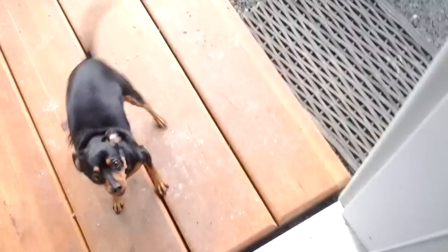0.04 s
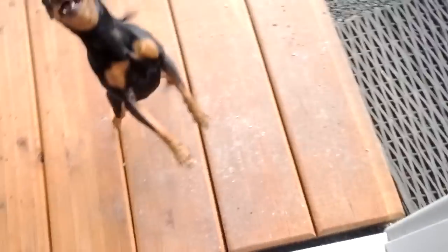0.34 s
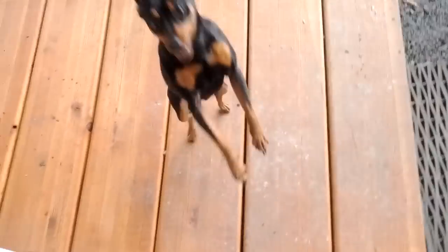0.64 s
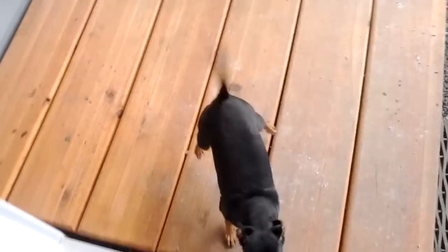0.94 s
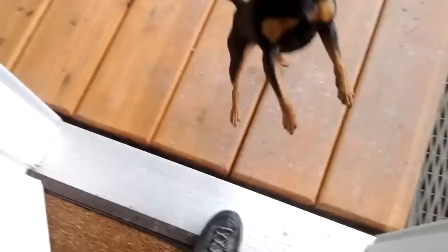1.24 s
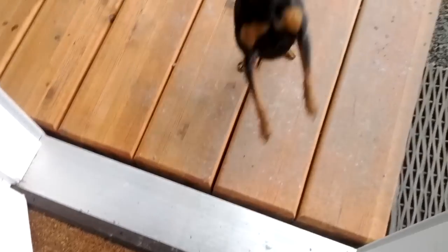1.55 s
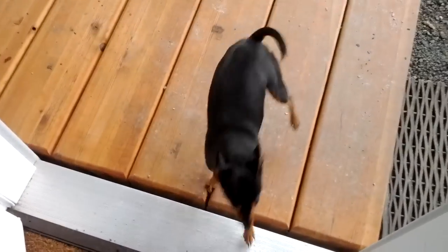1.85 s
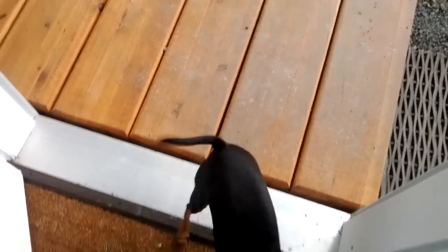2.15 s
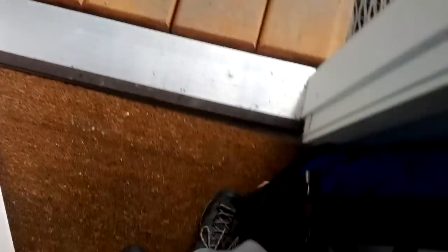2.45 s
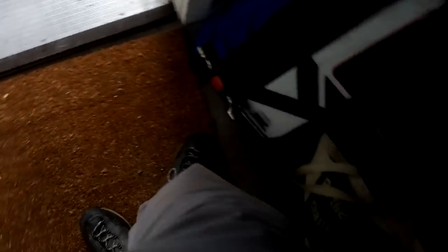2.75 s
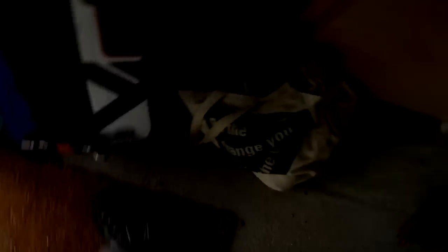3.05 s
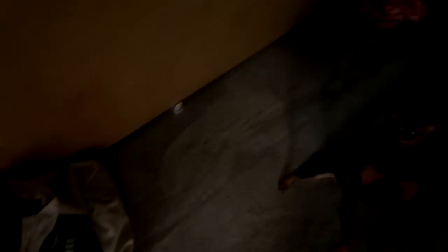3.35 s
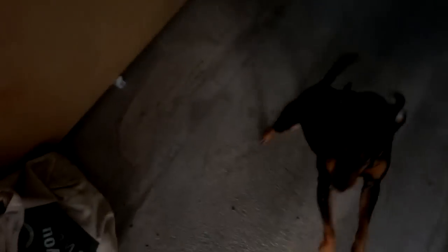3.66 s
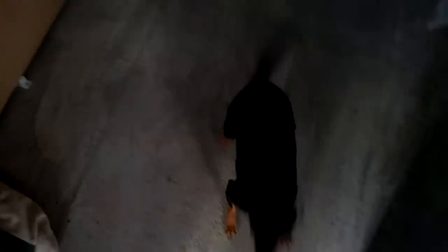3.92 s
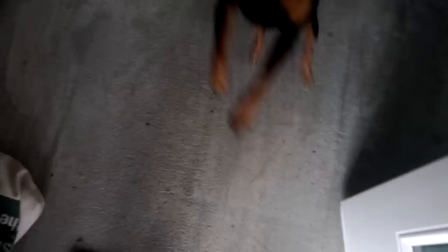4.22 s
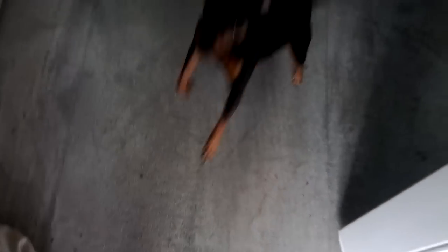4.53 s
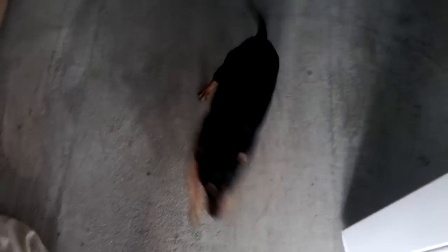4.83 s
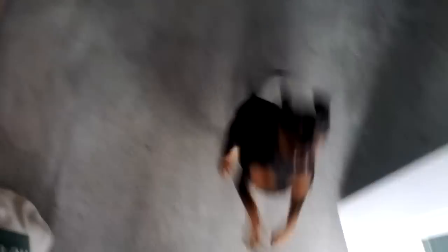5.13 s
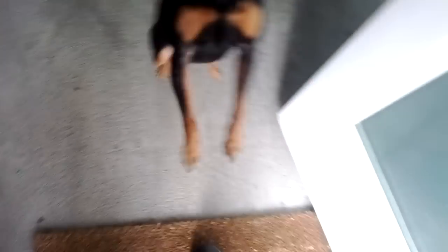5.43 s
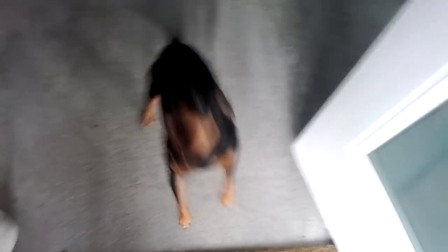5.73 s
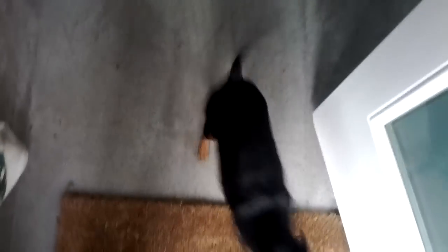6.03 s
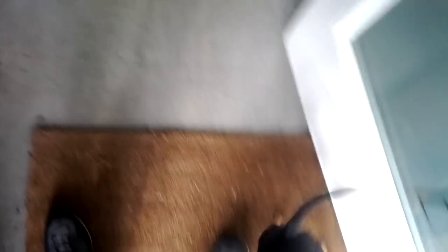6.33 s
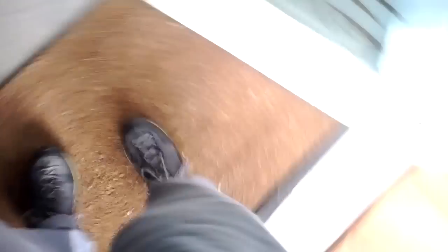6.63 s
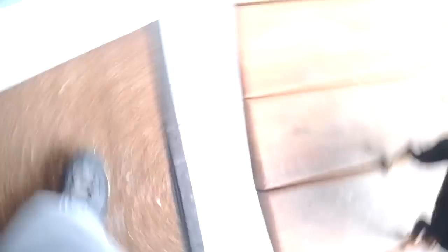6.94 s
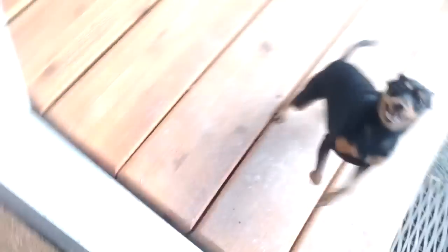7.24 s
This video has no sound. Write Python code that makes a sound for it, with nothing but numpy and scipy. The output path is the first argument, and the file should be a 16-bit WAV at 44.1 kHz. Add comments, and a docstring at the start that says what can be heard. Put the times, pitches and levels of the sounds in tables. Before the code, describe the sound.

Light claw ticks, a soft paw thud and a brief whimper lead into a steady run of piercing yelps from a little dog, with breathy puffs and scattered claw clicks between them. The sound starts dry on a wooden deck, gains a short echo as the dog runs indoors, then dries out again. The microphone is close and hand-held, with faint hiss, soft rumble and slight overload on peaks.

```python
"""Claws tick on a wooden deck over faint hiss; a paw thuds, and a small excited dog puffs and whimpers.
Then it jumps and yelps, running into a concrete-floored room that rings behind it, and out again.
Each shrill yelp, a tone of the vocal folds shaped by throat and mouth, falls away into a little grunt.
The puffs are turbulent air; claws and paws sound by impact and friction. The close, hand-held
microphone rumbles as it moves, and the loud yelps overload it."""
import sys
import numpy as np
from scipy import signal
from scipy.fft import rfft, irfft
from scipy.io import wavfile
from scipy.ndimage import uniform_filter1d

SR = 44100
rng = np.random.default_rng(int(sys.argv[2]) if len(sys.argv) > 2 else 0)


def transcribe(signal):
    """Save signal, clipped to [-1, 1], as a 16-bit WAV file at the path in sys.argv[1]."""
    frames = np.atleast_2d(signal).T
    limited = np.clip(frames, -1, 1)
    pcm = np.round(limited * 32767).astype(np.int16)
    wavfile.write(sys.argv[1], SR, pcm)


N = 329868
TIME = np.arange(N) / SR

# background hiss: frequency_hz, gain_db
AIR_SPECTRUM = [(18, -33), (30, 4.5), (133, 2.5), (379, -13), (852, -9), (996, -4), (1360, -15), (2910, -9),
                (6370, -16), (11300, -9.5), (15500, -19)]
# handling rumble: time_s, level_db
RUMBLE_LEVELS = [(0, -58), (2.4, -61), (2.8, -46), (3.8, -57), (3.88, -38), (4.75, -43.5), (5, -44),
                 (7.48, -65)]
# claws on the floor: start_s, level_db, scrape_decay_s
CLAW_STRIKES = [(0.02, -20.5, 0.0062), (0.075, -18, 0.0054), (0.242, -17.5, 0.011), (0.282, -23, 0.012),
                (0.338, -16.5, 0.0022), (1.9, 6, 0.0053), (1.932, -26, 0.0069), (2.443, -11, 0.012),
                (3.002, -18, 0.0042), (3.418, -23.5, 0.0063), (3.672, -18, 0.023), (3.83, -18, 0.045),
                (4.098, -22, 0.0042), (4.541, -12, 0.0036), (4.62, -16, 0.025), (4.649, -15, 0.012),
                (5.069, -19, 0.0045), (5.88, -16, 0.0045)]
# a claw's click: frequency_hz, gain_db
CLICK_SPECTRUM = [(150, -1), (600, -77), (2000, -4.5), (4500, -4.5), (7500, -3), (11000, 10.5),
                  (13500, 5.5), (16000, -91)]
# soft paw landings: start_s, pitch_hz, level_db
PAW_THUDS = [(0.039, 128, -29), (1.881, 160, -37)]
# puffs of breath: peak_s, rise_s, fall_s, hiss_db, rasp_over_hiss_db
BREATH_PUFFS = [(.1, 0.043, 0.11, -29, -7.5), (.528, 0.05, 0.033, -15.5, -14.5),
                (.96, 0.24, 0.041, -28.5, -2.5), (1.204, 0.02, 0.027, -25, 11.5),
                (1.363, 0.037, 0.05, -22, 6.5), (1.564, 0.03, 0.013, -37, 12.5),
                (2.135, 0.036, 0.034, -25, -3), (3.25, 0.036, 0.053, -28.5, -8),
                (4.215, 0.072, .025, -26, -1.5), (5.002, 0.016, 0.027, -21, 2.5),
                (5.401, 0.015, 0.014, -12, 0), (5.555, 0.015, 0.015, -36.5, 14),
                (5.83, 0.056, 0.033, -32.5, 8.5), (6.74, 0.072, 0.045, -31.5, -1.5),
                (6.89, 0.053, 0.064, -49, 12.5), (6.974, 0.0094, 0.022, -31, 9),
                (7.15, 0.011, 0.021, -29, -17), (7.3, 0.026, 0.078, -55.5, 19),
                (7.415, 0.022, 0.0053, -31.5, 7.5)]
# air hissing through teeth and nose: frequency_hz, gain_db
HISS_SPECTRUM = [(500, -41), (2000, -70), (4000, 2.5), (7000, -2.5), (9000, 9.5), (11300, 17.5),
                 (13000, 14), (15500, -60)]
# air rasping in the throat: frequency_hz, gain_db
RASP_SPECTRUM = [(200, -6.5), (700, -8), (1200, 5.5), (1600, -5), (2500, 8.5), (3400, 2), (4500, 0.5),
                 (7000, -1.5), (14000, -5)]
# whimpers and low grunts: start_s, length_s, first_hz, last_hz, level_db, roughness_ratio
WHIMPERS_AND_GRUNTS = [(0.124, 0.022, 990, 702, -19.5, 0.27), (.176, 0.047, 737, 652, -33, 0.38),
                       (.952, 0.06, 183, 136, -28.5, 1.1), (2.13, .078, 236, 194, -29, 0.2),
                       (2.5, 0.064, 220, 192, -33.5, 0.1), (2.804, 0.027, 1023, 827, -31, 0.13),
                       (2.849, 0.0797, 725, 605, -25.5, 0.3), (3.931, 0.053, 624, 579, -24.5, 0.6),
                       (6.217, 0.059, 231, 172, -29.5, 0.28)]
# yelps: start_s, length_s, dip_s, climb_s, break_s, low_hz, top_hz, end_hz, effort_db, open_db,
# shine_db, pierce_hz, break_change_db, grunt_db
# The pitch dips and breaks dip_s and break_s after the start. open_db lifts the mouth resonance near
# 2 kHz and shine_db the partials from 3 kHz up. break_change_db is the change of brightness at the
# break: positive dulls the yelp, negative brightens it.
YELP_CALLS = [(0.425, 0.062, 0.01, 0.027, 0.048, 1132, 1273, 1216, -8.5, 4, 0, 3980, 14, -21),
              (0.74, 0.14, 0.02, 0.022, 0.091, 830, 1082, 1164, -6.5, -2.5, 4.5, 3760, 9, -23),
              (1.203, 0.12, 0.0014, 0.025, 0.084, 915, 1093, 1143, 0.5, 3, 4, 3570, 12, -26),
              (1.612, 0.13, 0.0094, 0.053, 0.11, 624, 1156, 1301, -1, 1, -1, 3090, -15.5, -20.5),
              (2.033, 0.07, 0.025, 0.0096, 0.041, 888, 1110, 1120, -13, -11, -10, 3550, 2, -29),
              (2.38, 0.051, 0.02, 0.025, 0.035, 981, 1010, 1008, -11, -9.5, -9.5, 2860, 5, -26),
              (3.098, 0.09, 0.015, 0.015, 0.08, 846.4, 919.5, 1040, -9.5, -3.5, 8.5, 2810, 6, -29.5),
              (3.487, 0.072, 0.02, 0.047, 0.046, 899.3, 900, 1046, -11.5, -3, 2.5, 3795, 11, -40),
              (4.127, 0.063, 0.019, 0.029, 0.025, 969, 1140, 1198, -9.5, -2.5, -0.5, 3880, 10, -22),
              (4.407, 0.083, 0.017, 0.028, 0.072, 822.7, 1203, 1213, -5.5, 1, 2, 3320, 4, -73),
              (4.749, 0.19, 0.015, 0.042, 0.16, 772, 1081, 983, -5.5, 1.5, 1, 3170, 14.5, -28),
              (5.211, 0.16, 0.02, 0.036, 0.133, 969, 1212, 1089, -3.5, 1.5, 6, 3790, 23, -30),
              (5.626, 0.17, 0.0074, 0.026, 0.14, 650.6, 1063, 1171, -2, 3.5, 4, 2960, 8.5, -56),
              (6.083, 0.082, 0.017, 0.042, 0.065, 814.5, 1108, 1163, -11, -3.5, -3, 3100, -14, -30),
              (6.491, 0.162, 0.00051, 0.026, 0.13, 798, 1049, 1045, -4.5, -0.5, -8.5, 2700, 46, -45),
              (6.97, 0.13, 0.0, 0.019, 0.079, 760, 1020, 944.7, -1, 11, 5.5, 2630, 14, -35),
              (7.42, 0.086, 0.00036, 0.031, 0.099, 636, 973, 940, 3.5, -3.5, -2, 2680, -5, -55)]
# the yelps' tone colour (the throat, plus the microphone's lift near 11 kHz): frequency_hz, gain_db
YELP_COLOUR = [(500, -29), (1100, 2.5), (2200, -1), (4200, -3), (5500, -10.5), (7500, -16.5), (11000, -7),
               (15000, -19.5)]
# how much of the dog's sound reaches the room: time_s, gain_db
ROOM_FEED = [(0, -19), (2.4, -16.5), (3.15, -4.5), (4.15, -12), (4.5, -8), (5.75, -8), (6.15, -6.5),
             (7.48, -13.5)]
# reverberation time: frequency_hz, t60_s
ROOM_DECAY = [(200, 0.65), (1100, 0.55), (3200, 0.56), (12000, 0.6)]
# first reflections from floor, door and walls: delay_s, gain_over_tail_db
EARLY_ECHOES = [(.0041, -4.5), (0.0113, 5.5), (0.0189, -6)]

EDGE_HZ = 15700  # upper band limit
# a yelp scoops down from SCOOP_HZ above its dip, SCOOP_S earlier, and ends by sagging a share in pitch
SCOOP_HZ, SCOOP_S, SAG, SAG_S = 193.7, 0.017, 0.068, 0.0089
# its effort swells at the onset and drops at the release
ONSET_DB, ATTACK_S, RELEASE_DB, RELEASE_S = 15.5, 0.0058, 25, 0.0043
# the voice cracks as it changes register
BREAK_S, BREAK_CRACK, BREAK_CRACK_S = 0.0051, 0.37, .009
# unsteady folds, as shares of the pitch: jitter at rest, jitter added by strain, a slower waver
JITTER, STRAIN, WAVER, WAVER_HZ = .003, .006, 0.0061, 35
SHIMMER_DB, BREATH_DB = 1.3, -23
# the mouth snaps open and shuts slowly (a skew of 1 is an even arch)
MOUTH_SKEW, USUAL_OPENING, MOUTH_SWING_DB, BRIGHT_SWING_DB = 0.85, 0.97, 4.5, 11
# each partial flutters as the head moves
FLUTTER_DB, FLUTTER_HZ = 3.12, 30.4
# softer yelps are duller: treble dB per dB of effort; the piercing resonance grows as a power of push
TREBLE_PER_EFFORT, USUAL_EFFORT_DB, PIERCE_GROWTH = 0.35, -4.5, 0.28
# after each yelp the voice relaxes into a falling grunt
RELAX_GAP_S, RELAX_S, RELAX_FROM_HZ, RELAX_TO_HZ, RELAX_ROUGH = 0.0036, 0.0354, 830, 442, 0.23


def amp(db):
    """Amplitude ratio of a level in decibels."""
    return 10 ** (np.asarray(db) / 20)


def unit_rms(x):
    """Normalisation to an rms of 1."""
    return x / np.sqrt(np.mean(x ** 2) + 1e-20)


def value_at(points, hz):
    """Interpolation on a log-frequency axis."""
    f, value = np.transpose(points)
    return np.interp(np.log(hz + 1), np.log(f + 1), value)


def add(mix, start_s, sound):
    """Superposition: a sound joins the mix at start_s."""
    part = mix[max(round(start_s * SR), 0):][:len(sound)]
    part += sound[:len(part)]


def noise(spectrum, size=N):
    """Spectral shaping of white noise, at rms 1."""
    gain = amp(value_at(spectrum, np.fft.rfftfreq(size, 1 / SR)))
    return unit_rms(irfft(rfft(rng.standard_normal(size)) * gain, size))


def wander(hz, size):
    """Random drift: noise low-passed at hz, at rms 1."""
    lowpass = signal.butter(2, hz, fs=SR, output="sos")
    return unit_rms(signal.sosfilt(lowpass, rng.standard_normal(size + SR))[SR:])


def patchy(x, depth_db):
    """Random modulation, as in turbulence: patches of time and frequency swell and fade."""
    bands = signal.stft(x, nperseg=256)[2]
    field = uniform_filter1d(rng.standard_normal(bands.shape), size=7, axis=0)
    field = unit_rms(uniform_filter1d(field, size=4, axis=1))
    return unit_rms(signal.istft(bands * amp(depth_db * field), nperseg=256)[1][:N])


def background(air_db=-42, rumble_hz=42):
    """Ambient and handling noise: a faint hiss, and the rumble of the moving microphone."""
    air = amp(air_db + wander(14.0, N)) * noise(AIR_SPECTRUM)
    rumble = amp(np.interp(TIME, *np.transpose(RUMBLE_LEVELS))) * wander(rumble_hz, N)
    return air + rumble


def claws(hit_db=-5, grit_db=5.0, patter_per_s=22, patter_db=-38, spread_db=3):
    """Impact and friction: claws strike and skid in gritty bursts, with lighter ticks between."""
    force, t = np.zeros(N), np.arange(SR // 6) / SR
    for start_s, db, decay_s in CLAW_STRIKES:
        add(force, start_s, amp(db + hit_db) * np.exp(-t / decay_s))
    ticks = rng.random(N) < patter_per_s / SR
    tick_db = patter_db + spread_db * np.minimum(rng.exponential(1, N), 3)
    force += signal.oaconvolve(ticks * amp(tick_db), np.exp(-t / .002))[:N]
    return force * patchy(noise(CLICK_SPECTRUM), grit_db) * amp(grit_db * wander(1040, N))


def paw_thud(hz, db, ring_s=0.01):
    """Damped vibration: a soft pad pushes the floor, which rings for a few cycles."""
    t = np.arange(SR // 8) / SR
    return amp(db) * t / ring_s * np.exp(1 - t / ring_s) * np.sin(2 * np.pi * hz * t)


def puffs(flicker_db=3):
    """Turbulent flow: short swells of breath hiss at teeth and nose and rasp in the throat."""
    hiss, rasp = np.zeros((2, N))
    for peak_s, rise_s, fall_s, hiss_db, rasp_over_hiss_db in BREATH_PUFFS:
        width_s = np.where(TIME < peak_s, rise_s, fall_s)
        swell = amp(hiss_db) * np.exp(-np.square((TIME - peak_s) / width_s))
        hiss += swell
        rasp += swell * amp(rasp_over_hiss_db)
    hiss *= patchy(noise(HISS_SPECTRUM), flicker_db)
    rasp *= patchy(noise(RASP_SPECTRUM), flicker_db)
    return hiss + rasp


def grunt(length_s, first_hz, last_hz, db, rough, jitter=0.44, rasp_db=-1, fade_db=8, overtone_db=-9.5):
    """Irregular oscillation: slack folds slide down in pitch, with a rasp of air."""
    progress = np.linspace(0, 1, int(length_s * SR))
    n = len(progress)
    hz = first_hz * (last_hz / first_hz) ** progress * (1 + jitter * rough * wander(277, n))
    phase = 2 * np.pi * np.cumsum(hz) / SR
    folds = unit_rms(sum(amp(overtone_db * k) * np.sin((k + 1) * phase) for k in range(4)))
    air = rough * amp(rasp_db) * noise(RASP_SPECTRUM, n)
    return amp(db - fade_db * progress) * (folds + air) * signal.windows.tukey(n, .3)


def yelp(start_s, length_s, dip_s, climb_s, break_s, low_hz, top_hz, end_hz, db, open_db, shine_db,
         pierce_hz, break_change_db, pierce_db=13, width_hz=400, edge_s=.007, bloom_s=0.0028,
         crack_s=0.0063):
    """Source and filter: throat, mouth and microphone colour the harmonics of the vocal folds."""
    t = np.arange(-edge_s / 2, length_s + edge_s / 2, 1 / SR)
    age, n = np.clip(t, 0, length_s), len(t)
    # the pitch scoops down, climbs and levels off, then breaks into another register and sags
    scoop = (np.maximum(dip_s - age, 0) / SCOOP_S) ** 2
    climb = (np.maximum(age - dip_s, 0) / climb_s) ** 2
    broken = .5 + .5 * np.tanh((age - break_s) / BREAK_S)
    hz = low_hz + SCOOP_HZ * scoop + (top_hz - low_hz) * climb / (1 + climb)
    hz = (hz + broken * (end_hz - hz)) * (1 - SAG * np.exp((age - length_s) / SAG_S))
    hz *= 1 + WAVER * wander(WAVER_HZ, n)

    # the folds shake harder when pushed, and crack at the start, the end and the break
    release = np.exp((age - length_s) / RELEASE_S)
    effort_db = db - ONSET_DB * np.exp(-age / ATTACK_S) - RELEASE_DB * release
    push = np.minimum(amp(effort_db), 1)
    crack = push.max() * (np.exp((t[0] - t) / crack_s) + np.exp((t - t[-1]) / crack_s))
    crack += BREAK_CRACK * push * np.exp(-np.abs(age - break_s) / BREAK_CRACK_S)
    shake = JITTER + STRAIN * (push + 10 * crack)
    phase = 2 * np.pi * np.cumsum(hz * (1 + shake * wander(110, n))) / SR

    # the opening mouth and rising effort lift the upper partials
    k = np.arange(1, 21)[:, None]
    partial_hz = k * hz
    mouth_band = np.interp(partial_hz, [1200, 2000, 3000, 7000, 11000], [0, 1, 0, 0, .5])
    bright_band = np.interp(partial_hz, [2000, 3000], [0, 1])
    treble_band = np.interp(partial_hz, [4200, 5700], [0, 1])
    pierce_band = 1 / (1 + ((partial_hz - pierce_hz) / width_hz) ** 2)
    opening = np.sin(np.pi * (age / length_s) ** MOUTH_SKEW) - USUAL_OPENING
    gain_db = value_at(YELP_COLOUR, partial_hz)
    gain_db += mouth_band * (open_db + MOUTH_SWING_DB * opening - break_change_db * broken)
    gain_db += bright_band * (shine_db + BRIGHT_SWING_DB * opening - break_change_db * broken)
    gain_db += pierce_band * pierce_db * push ** PIERCE_GROWTH
    gain_db += treble_band * TREBLE_PER_EFFORT * (np.minimum(effort_db, 0) - USUAL_EFFORT_DB)
    gain_db += FLUTTER_DB * wander(FLUTTER_HZ, gain_db.size).reshape(gain_db.shape)
    # the highest partials bloom only once the folds close fully
    bloom = np.where(partial_hz > 4500, 1 - np.exp((t[0] - t) / bloom_s), 1)
    weights = amp(gain_db) * bloom * (partial_hz < EDGE_HZ)
    weights /= np.sqrt((weights ** 2).sum(0) / 2)

    folds = (weights * np.cos(k * phase + k ** 2)).sum(0) * amp(SHIMMER_DB * wander(117, n))
    folds *= 1 + crack * np.sin(phase / 3)  # subharmonic sidebands
    # air escapes once a cycle, while the folds are open
    breath = amp(BREATH_DB) * noise(YELP_COLOUR, n) * (1 + np.cos(phase))
    taper = signal.windows.tukey(n, 2 * edge_s / (t[-1] - t[0]))
    return start_s + t[0], amp(effort_db) * (folds + breath) * taper


def room(x, delay_s=.012):
    """Reverberation: a few distinct echoes, and a diffuse tail whose bands die at their own rates."""
    hz, t, bands = signal.stft(rng.standard_normal(SR), SR, nperseg=256)
    decay = amp(-60 * t / value_at(ROOM_DECAY, hz)[:, None])
    tail = signal.istft(bands * decay, SR, nperseg=256)[1]
    response = np.r_[np.zeros(int(delay_s * SR)), tail / np.linalg.norm(tail)]
    for echo_s, db in EARLY_ECHOES:
        response[round(echo_s * SR)] += amp(db)
    return signal.fftconvolve(x, response)[:N]


def scene():
    """Superposition of dog, room and background, the same in both ears."""
    dog = puffs() + claws()
    for start_s, length_s, *voice, grunt_db in YELP_CALLS:
        add(dog, *yelp(start_s, length_s, *voice))
        relaxing = grunt(RELAX_S, RELAX_FROM_HZ, RELAX_TO_HZ, grunt_db, RELAX_ROUGH)
        add(dog, start_s + length_s + RELAX_GAP_S, relaxing)
    for start_s, *voice in WHIMPERS_AND_GRUNTS:
        add(dog, start_s, grunt(*voice))
    for start_s, hz, db in PAW_THUDS:
        add(dog, start_s, paw_thud(hz, db))
    indoors = amp(np.interp(TIME, *np.transpose(ROOM_FEED)))
    mix = dog + room(dog * indoors) + background()
    return np.array([mix, mix])


def record(dry, ceiling=0.64, asymmetry=0.17):
    """Asymmetric clipping: overload flattens loud peaks and adds a low flutter; a low-pass follows."""
    oversampled = signal.resample_poly(dry, 2, 1, axis=1)
    bent = oversampled - asymmetry * np.minimum(oversampled ** 2, 2)
    clipped = signal.resample_poly(np.clip(bent, -ceiling * (1 + asymmetry), ceiling), 1, 2, axis=1)
    lowpass = signal.firwin(511, EDGE_HZ, window=("kaiser", 8), fs=SR)
    return signal.oaconvolve(clipped, lowpass[None], "same")


dry = scene()
out = record(dry)
transcribe(out)
```